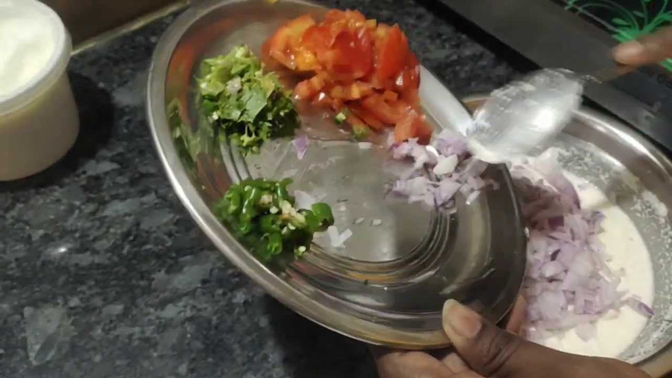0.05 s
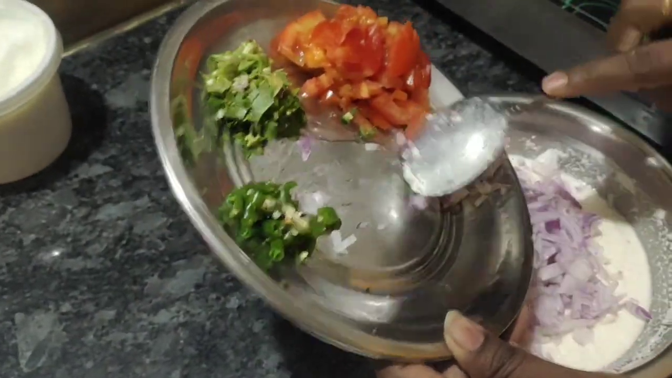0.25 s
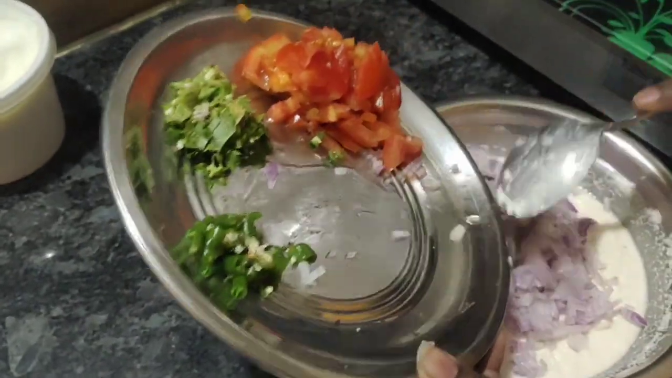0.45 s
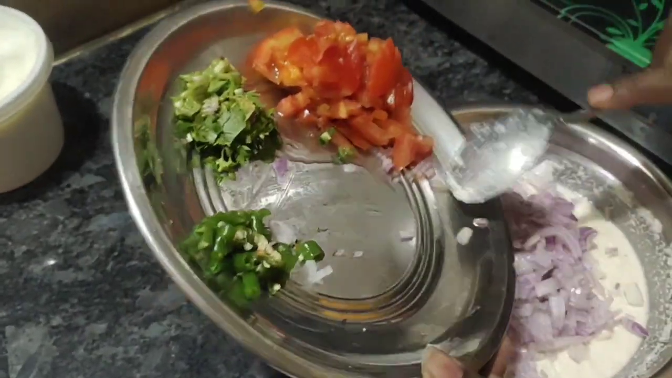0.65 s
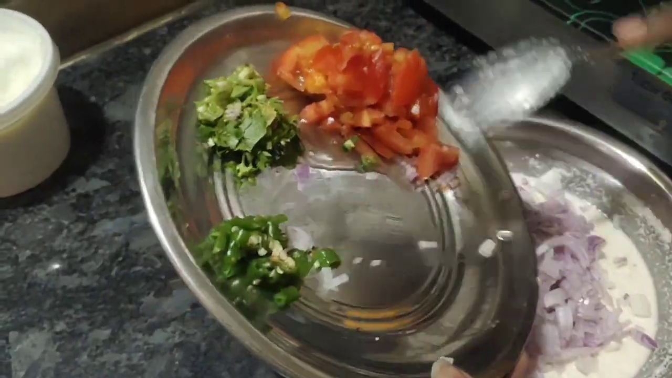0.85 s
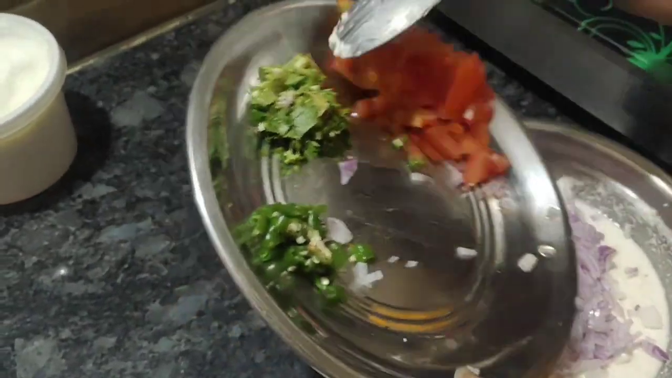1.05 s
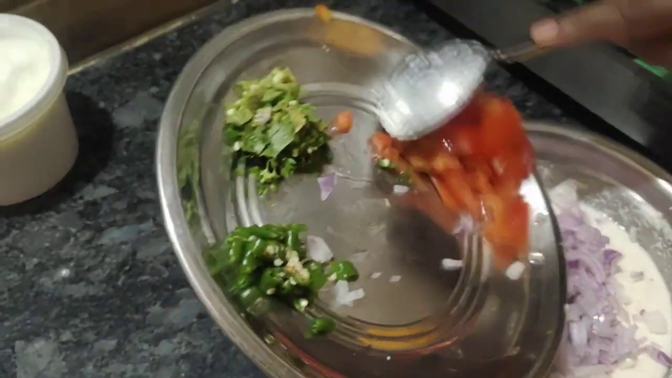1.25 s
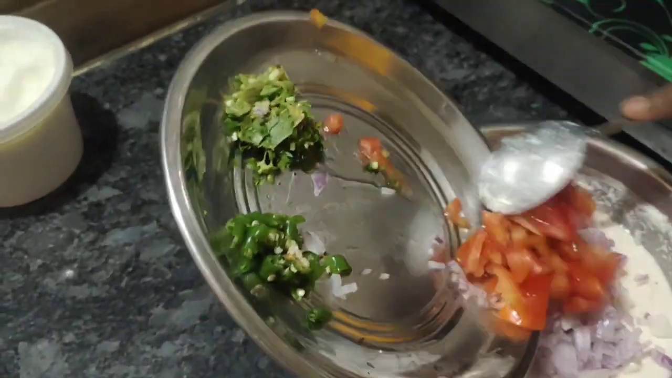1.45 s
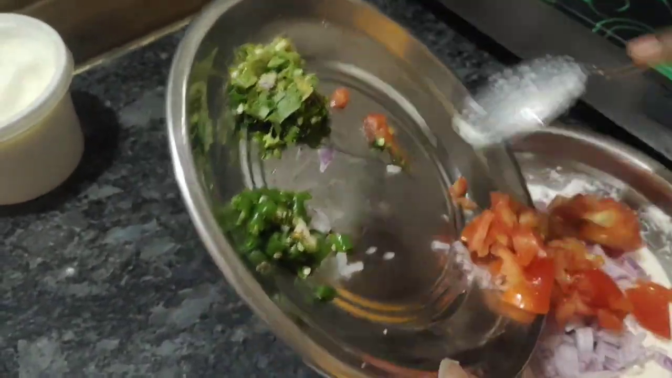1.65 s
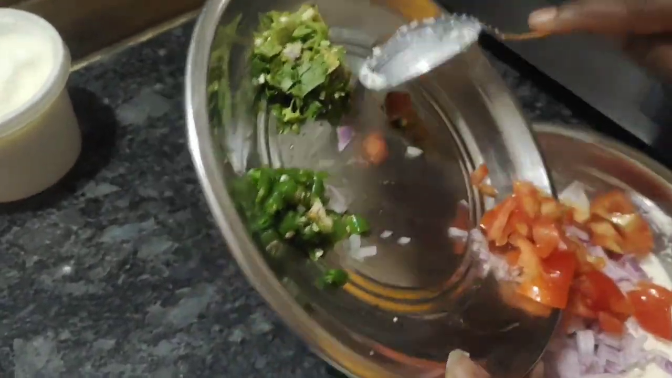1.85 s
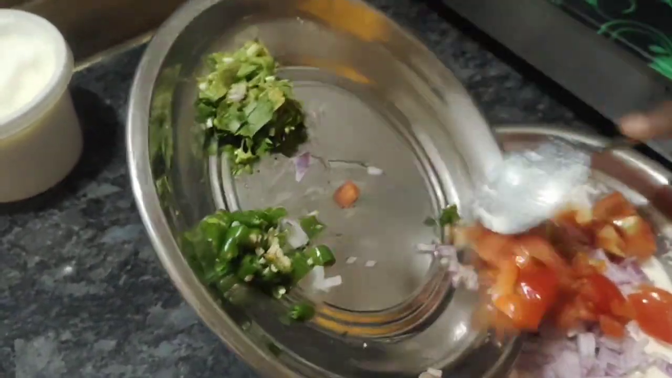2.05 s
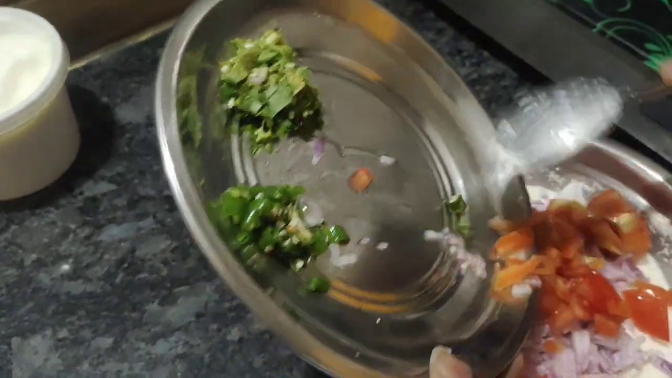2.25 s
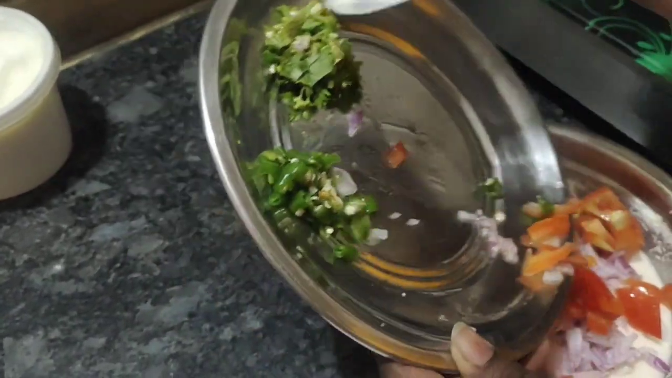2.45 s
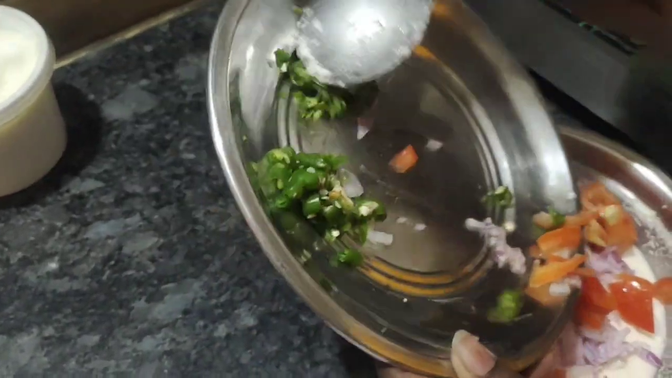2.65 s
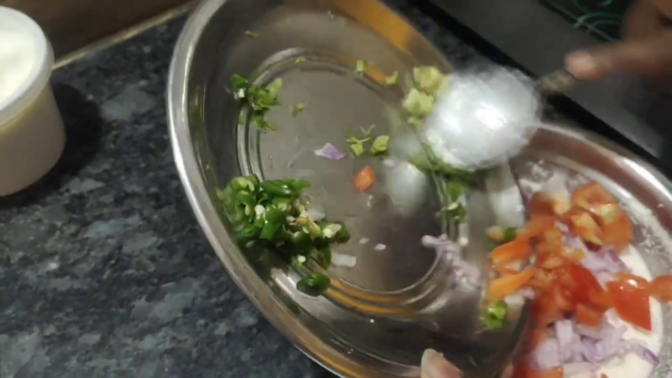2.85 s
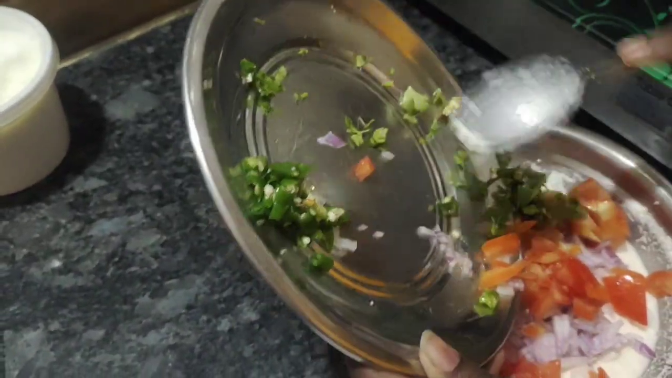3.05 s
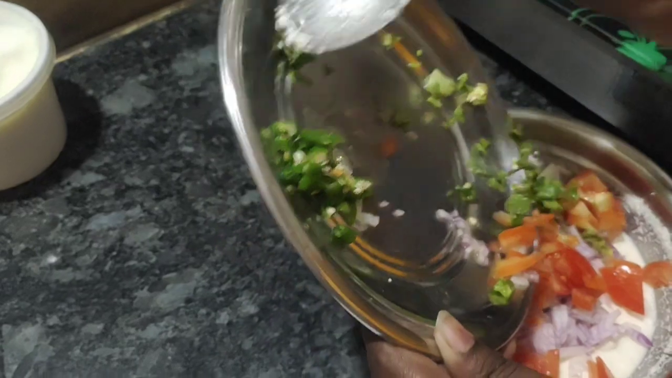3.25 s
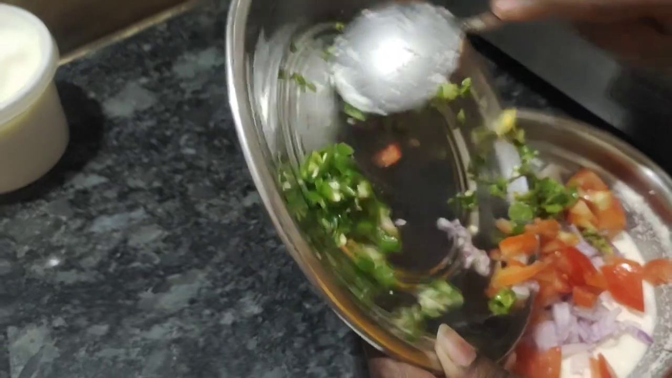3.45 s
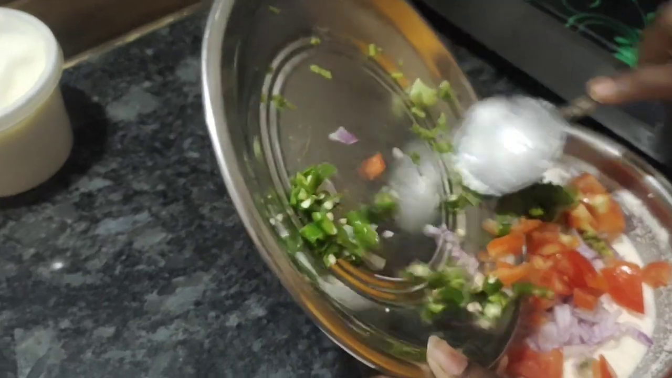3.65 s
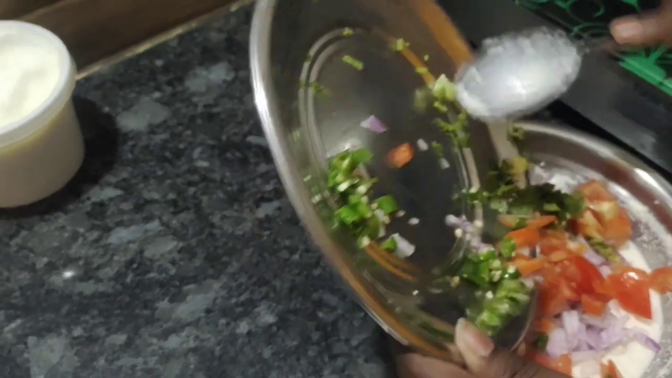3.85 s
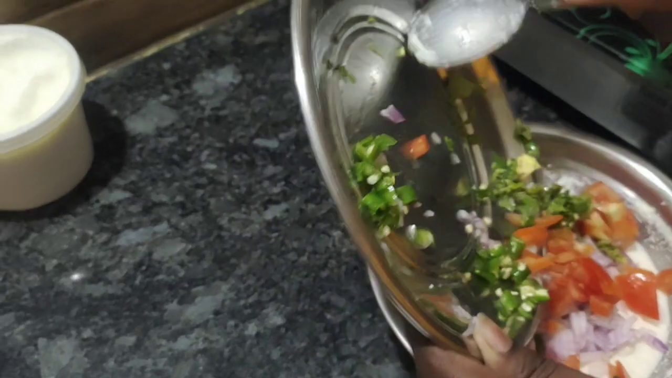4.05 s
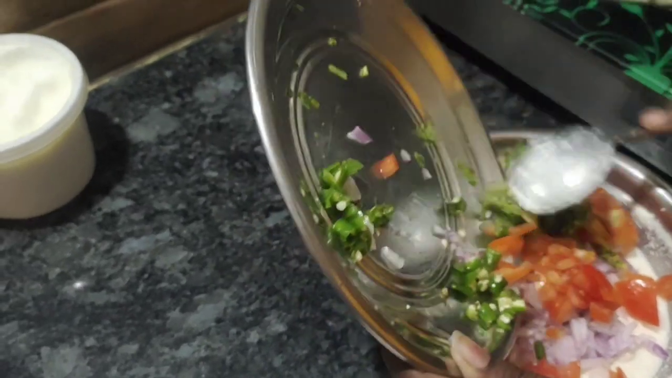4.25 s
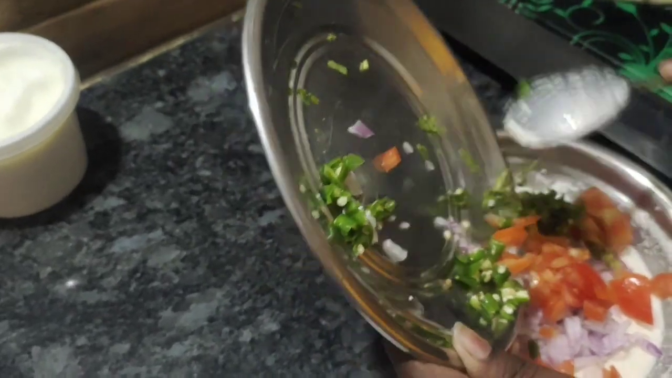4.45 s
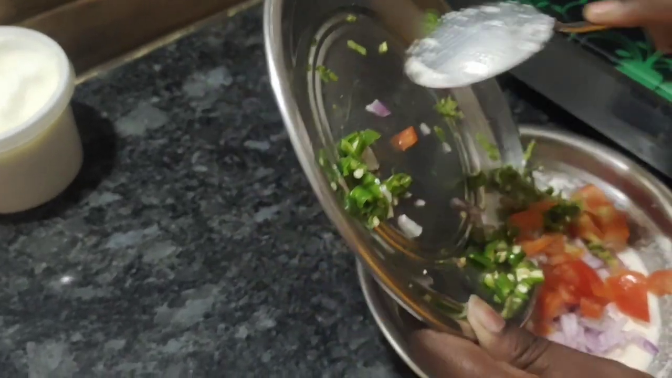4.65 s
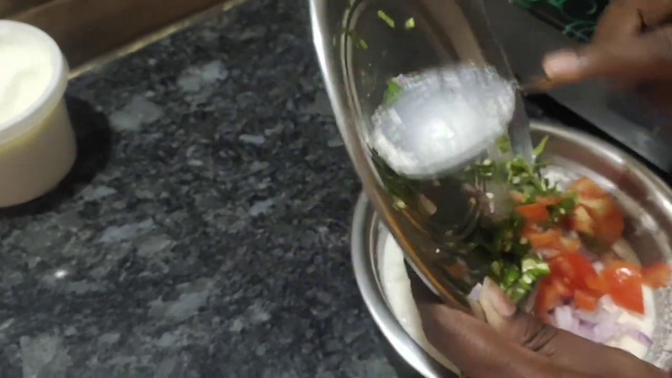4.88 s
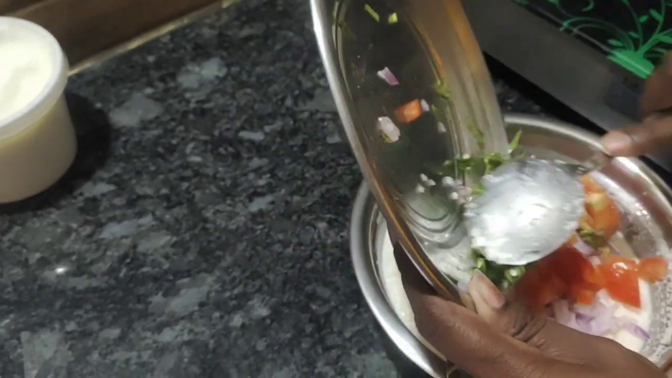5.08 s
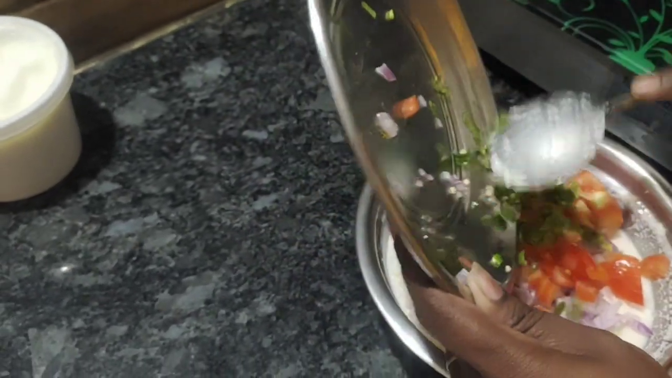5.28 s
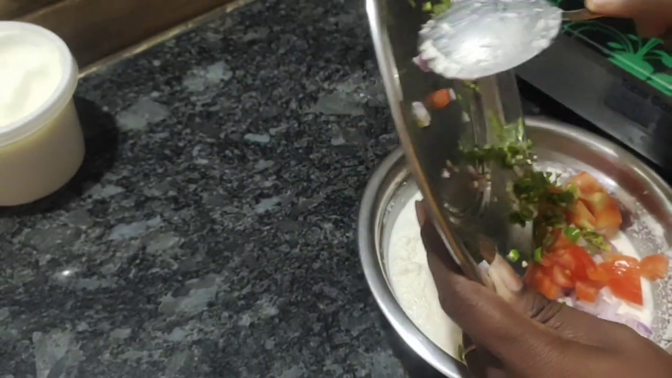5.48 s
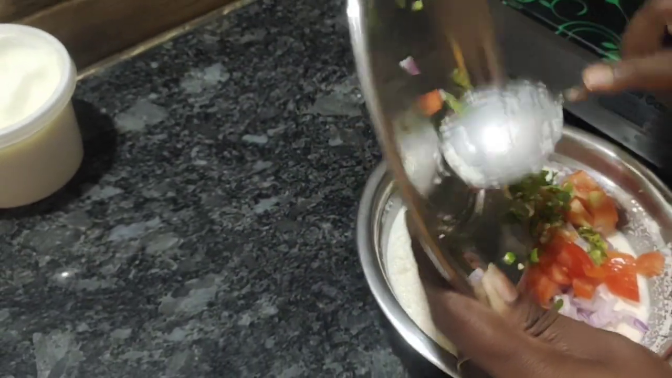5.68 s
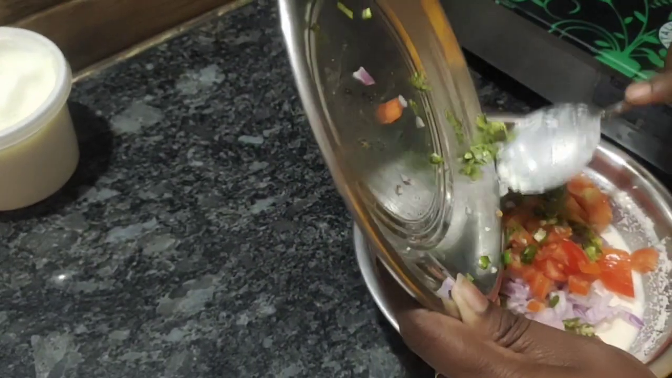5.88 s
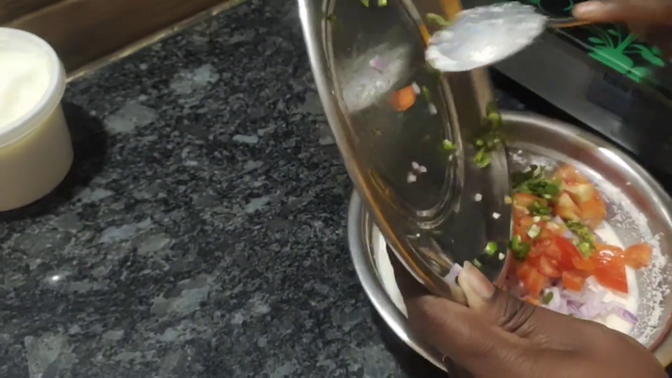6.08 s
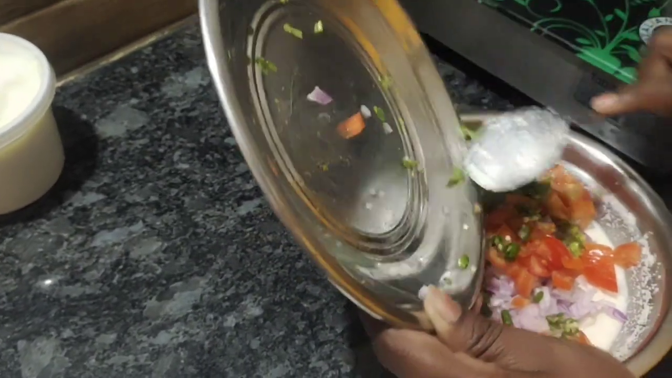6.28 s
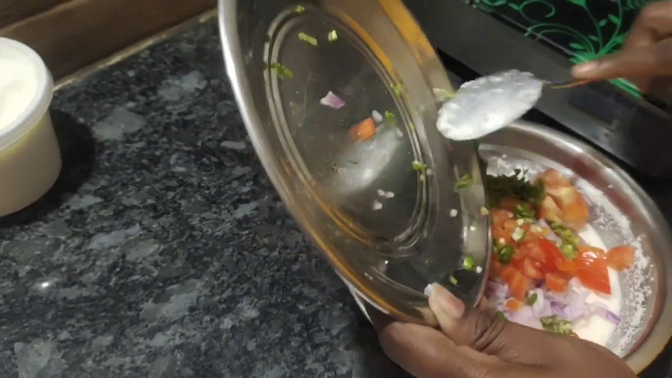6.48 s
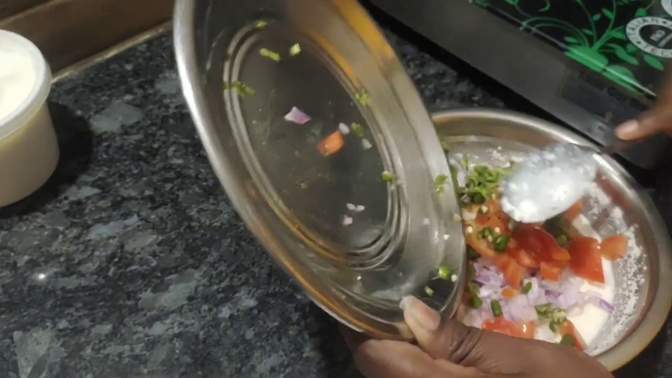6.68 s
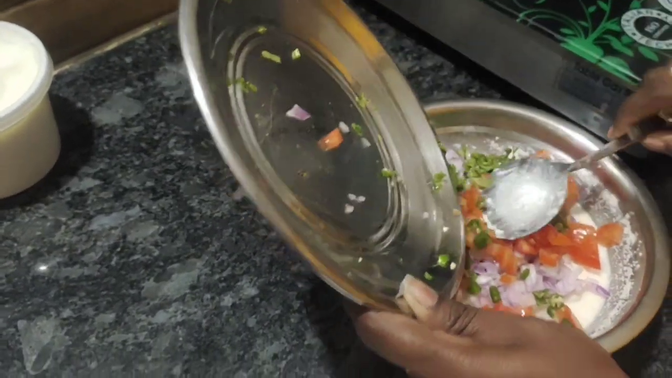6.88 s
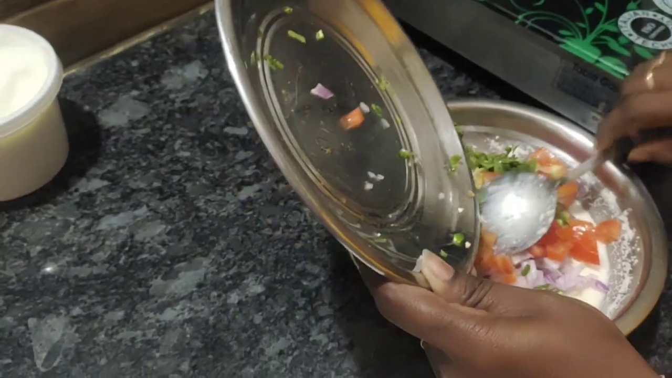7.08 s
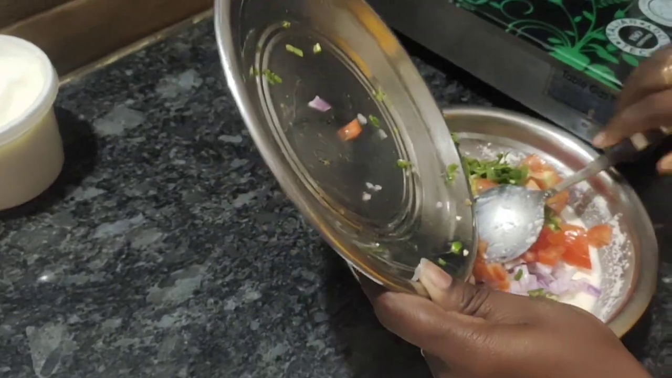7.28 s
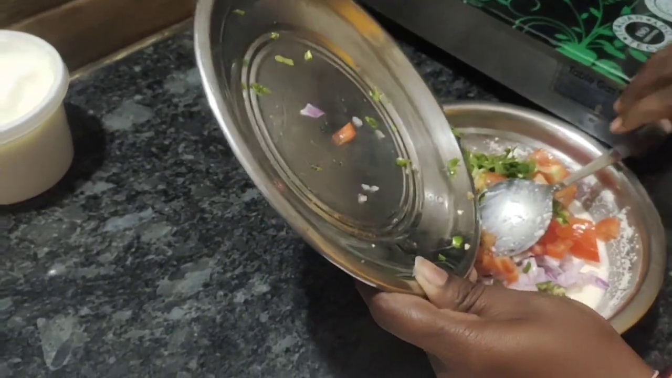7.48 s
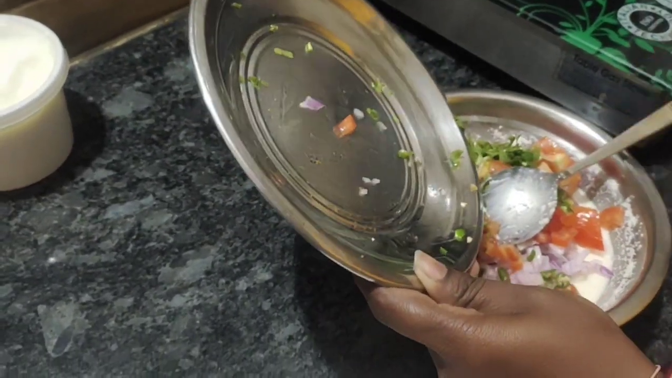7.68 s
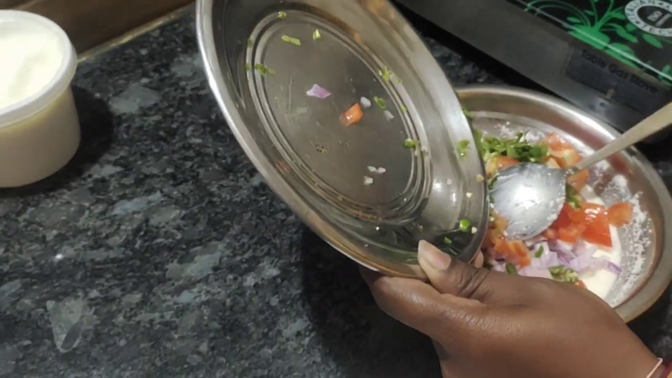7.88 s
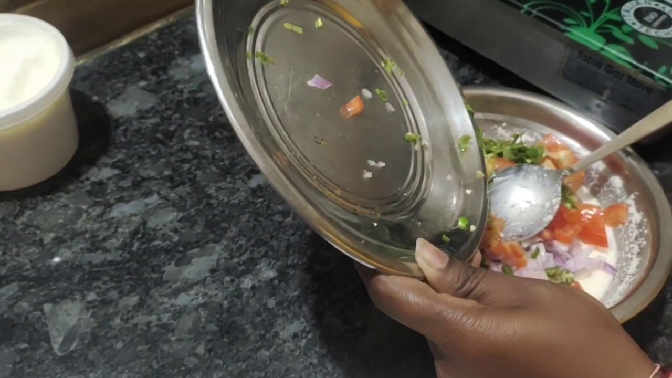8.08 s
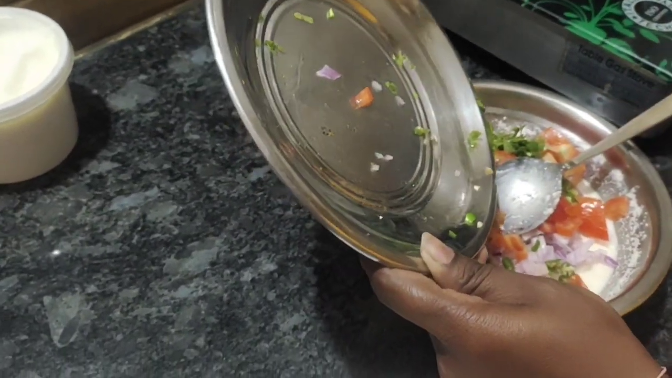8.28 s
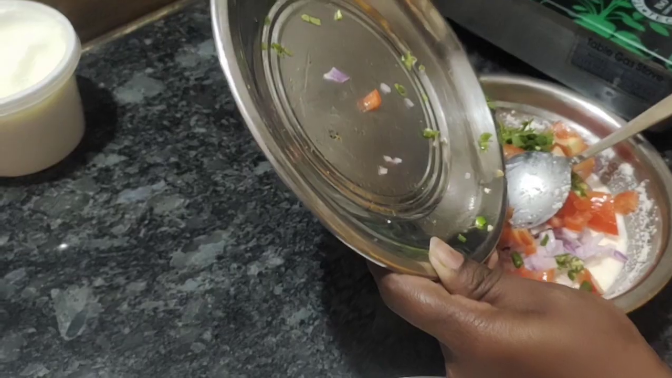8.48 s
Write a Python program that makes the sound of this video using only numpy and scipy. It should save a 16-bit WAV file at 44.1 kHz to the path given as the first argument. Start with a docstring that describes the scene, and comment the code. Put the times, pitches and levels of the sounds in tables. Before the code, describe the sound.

A quiet kitchen with hard walls, heard close through a noise-suppressed microphone, mainly on the left with faint hiss on the right. From 0.25 s a steel spoon makes light clinks on a thin hand-held steel plate, then a strong clank at 0.65 s with a short scrape. Raspy strokes follow at 1.1 to 1.5 s, then taps and scraping around 1.85 to 2.3 s. Another sharp clank comes at 2.6 s, a double hit at 3.3 to 3.4 s with longer scraping, and small ticks and a thud near 3.65 s. A bright scrape comes at 4.05 s, sparser strokes at 4.9 to 5.1 s, then firmer scrapes at 5.6, 5.8, 6.15 and 6.55 s. At 7.13 s the spoon drops into a steel bowl, clanking and ringing high for about half a second. Near silence follows, with a faint rustle around 8 s and tiny ticks at 8.2 to 8.3 s.

```python
"""Faint kitchen air, then a steel spoon tapping and scraping a hand-held steel plate; at 7.1 s it drops in a steel bowl.
Taps and drop: decaying modes plus noise bursts. Scrapes: random slips, partly through the plate's modes.
Small ticks, a faint rustle and soft tones fill the gaps; hard kitchen walls echo the spoon's sounds, ticks and tones.
Left: one microphone with noise suppression. Right: only a weak hiss that follows the left level."""
import sys
import numpy as np
from scipy import signal
from scipy.fft import rfft, irfft, next_fast_len
from scipy.io import wavfile
from scipy.ndimage import uniform_filter1d, map_coordinates

SR = 44100
rng = np.random.default_rng(int(sys.argv[2]) if len(sys.argv) > 2 else 0)


def unload_wav(signal):
    """Save mono or channel-first audio to the path in sys.argv[1] as 16-bit WAV at rate SR, clipped to [-1, 1]."""
    wavfile.write(
        sys.argv[1],
        SR,
        np.round(np.clip(np.atleast_2d(signal).T, -1, 1) * 32767).astype(np.int16),
    )


N = 376048

# kitchen air spectrum: (frequency [Hz], relative level [dB])
AIR_SPECTRUM = [(25, -39), (114, -2.5), (263, -7.5), (1260, -13.5), (2690, -18.5), (5880, -20), (6380, -6),
                (7510, -24), (16000, -31)]
# right-channel hiss spectrum: (frequency [Hz], relative level [dB])
HISS_SPECTRUM = [(30, -34.5), (120, 0.5), (350, 3), (600, -2.5), (3300, -8), (6500, -19), (15000, -26)]
# spoon blows on the plate:
# (time [s], relative level [dB], bass tilt [dB], middle tilt [dB], treble tilt [dB])
BLOWS = [(0.2427, -28.5, -10, 10.5, -6.5), (0.3401, -24, -0.5, 12.5, 3.5), (0.386, -33.5, 7.5, 21, -1.5),
         (0.407, -20.5, -11, -9, -12), (0.662, -12, -7.5, 8, -11.5), (1.1155, -19, -3, 9.5, -9),
         (1.8409, -32.5, 12.5, 7.5, -27), (2.0268, -27, 3, 4, -0.5), (2.043, -19.5, 2, 14, -2),
         (2.0553, -16.5, -9, -4.5, -5), (2.599, -12.5, -8, 5, -9.5), (2.6987, -26, 5.5, 12, -3),
         (2.7058, -17.5, 1.5, 13.5, -3.5), (3.292, -17.5, 5, 10, -4.5), (3.4033, -13, -0.5, 9.5, -10.5),
         (3.9935, -22, 4.5, 3.5, 5), (4.883, -27.5, 7.5, 1, -7), (5.586, -23.5, -1.5, -8, -6),
         (5.7706, -24, 9.5, 14, 4), (5.7924, -15, -6.5, 4.5, -3.5), (6.135, -19, 0.5, 9.5, -4.5),
         (6.212, -27, 1, 11, -7.5), (6.5636, -24, 9, -4.5, -6)]
# glancing taps, plate rings little:
# (time [s], relative level [dB], bass tilt [dB], middle tilt [dB], treble tilt [dB])
TAPS = [(2.9093, -26, 7, 1, -3), (4.2674, -27.5, -50, 8, -2), (6.227, -20, 3, -20, -10)]
# plate modes: (frequency [Hz], relative level [dB], t60 [s])
PLATE_MODES = [(312.3, 1.5, 0.43), (344, 0.5, 0.39), (393.4, 0.5, 0.4), (640, -13.5, 0.065),
               (760.4, -7.5, 0.23), (832, -8, 0.12), (931.3, -4, 0.18), (1238, -8, 0.078),
               (1589, -11, 0.082), (1968, -6, 0.059), (2112, -3, 0.2), (2215, -1, 0.55), (3140, -4, 0.42),
               (3580, -7.5, 0.71), (3641, 2, 0.092), (3940, 2.5, 0.2), (3850, -2, 0.26), (5130, -10, 0.15),
               (5950, -3.5, 0.17), (5940, -5, 0.64), (6290, -1, 0.25), (6300, -4, 0.15),
               (7080, -8.5, 0.012)]
# contact crack spectrum: (frequency [Hz], relative level [dB])
CRACK_SPECTRUM = [(80, -71.5), (338, -21), (575, -28), (2040, -21.5), (2720, -15), (3540, -7),
                  (4620, -13.5), (6740, -4.5), (9400, -31.5), (16000, -50)]
# plate's low hum: (time [s], level [dB])
HUM_COURSE = [(.25, -84), (.45, -57), (.62, -65), (1.05, -63.5), (1.55, -61.5), (2.4, -71), (3.2, -81),
              (3.9, -63), (4.3, -55), (4.7, -108), (6.9, -87)]
# spoon edge along the plate: (start [s], rise [s], hold [s], bright rasp level [dB], plate drone level [dB])
SCRAPES = [(0.259, 0.0028, 0.14, -50.5, -45.5), (0.369, 0.014, 0.085, -41.5, -47.5),
           (0.669, 0.021, 0.13, -49, -47), (1.118, .01, .08, -43, -39), (1.184, 0.086, 0.14, -35.5, -91),
           (1.463, 0.013, 0.04, -42, -50.5), (1.83, 0.014, 0.088, -61.5, -42.5),
           (1.881, 0.084, 0.026, -43, -57), (2.01, 0.015, 0.16, -38, -37),
           (2.299, 0.011, 0.017, -43, -56.5), (2.61, 0.0093, 0.077, -51, -40),
           (2.692, 0.0075, 0.04, -49.5, -60), (2.775, 0.015, 0.08, -40.5, -46),
           (3.299, 0.0032, 0.31, -48, -39.5), (3.597, 0.0062, 0.23, -55.5, -50.5),
           (3.859, 0.062, 0.13, -60, -57.5), (4.005, 0.017, 0.047, -75.5, -43.5),
           (4.062, 0.041, 0.1, -34, -51), (4.906, 0.011, 0.12, -40, -43.5), (5.04, 0.011, 0.0074, -31, -39),
           (5.117, 0.0082, 0.021, -44, -51), (5.581, 0.0093, 0.21, -43.5, -36),
           (5.807, 0.025, 0.11, -45, -37), (6.128, 0.035, 0.067, -33, -30),
           (6.248, 0.032, 0.035, -43.5, -41.5), (6.559, 0.04, 0.045, -39, -41.5)]
# rasp spectrum, also the rustle's: (frequency [Hz], relative level [dB])
RASP_SPECTRUM = [(2000, -34), (2750, -26), (3300, -8), (4200, -10), (4900, -7), (5600, -9), (6700, -2),
                 (8800, -24), (10500, -36.5), (15500, -36.5)]
# kitchen reverberation: (frequency [Hz], t60 [s])
KITCHEN_T60 = [(200, 0.35), (1000, 0.37), (4000, 0.39), (10000, 0.18), (16000, 0.21)]
# soft tones: (start [s], length [s], first frequency [Hz], last frequency [Hz], level [dB])
FAINT_TONES = [(1.033, 0.11, 334, 332, -57), (1.502, 0.12, 469, 468, -58), (4.767, 0.25, 1067, 1233, -61.5),
               (7.427, 0.13, 980, 973, -65.5), (7.787, 0.22, 655.5, 649, -68)]
# small ticks and thuds: (time [s], level [dB], pitch [Hz], t60 [s])
TICKS = [(3.6, -34, 3460, 0.033), (3.601, -43, 6850, 0.047), (3.642, -27, 352, 0.15),
         (3.663, -38, 3740, .04), (3.7, -30, 3700, 0.021), (3.738, -42.5, 6630, .04),
         (4.503, -55.5, 3680, 0.071), (6.288, -25.5, 3820, 0.023), (4.502, -38.5, 590, 0.035),
         (5.31, -51.5, 6420, 0.05), (6.864, -56, 2840, 0.14), (6.907, -47.5, 6660, 0.03),
         (7.301, -59.5, 125, 1.2), (7.9, -64, 89.4, 0.56), (8.215, -43, 2230, 0.032),
         (8.284, -50.5, 3190, 0.087), (8.293, -34.5, 6920, 0.028)]
# rustle: (time [s], level [dB])
RUSTLE_COURSE = [(7.8, -86.5), (7.95, -62.5), (8.1, -58), (8.2, -72), (8.27, -84)]
# spoon lands in the bowl: (time [s], relative level [dB])
DROP = [(7.1325, -9.5)]
# bowl modes: (frequency [Hz], relative level [dB], t60 [s])
BOWL_MODES = [(501, -26, .35), (926, -31, .5), (1690, -26, .45), (2320, -22, .45), (3225, -14, .55),
              (3860, -12, .4), (3736, -11, .42), (5270, -10, .26), (5669, -7, .75), (5959, -8, .34),
              (6212, -12, .37), (6756, -15, .4), (14930, -20, .04)]

AIR_DB = -66
GRAZE_S = 0.005  # light touch before a blow
TAP_RING_DB = -12
START_DB, SAG_DB_PER_S, LIFT_DB_PER_S = -23.5, 50, 477.5  # scrape: first touch, sliding loss, fall on lifting
TOP_HZ = 16100


def amp(db):
    """Gain of a level in dB."""
    return 10 ** (np.asarray(db) / 20)


def unit(x):
    """x at rms 1."""
    return x / np.sqrt(np.mean(x ** 2) + 1e-20)


def along(points, hz):
    """(frequency [Hz], value) points read on a log-frequency axis."""
    f, v = np.transpose(points)
    return np.interp(np.log(hz + 1), np.log(f + 1), v)


def filtered(x, response):
    """x times a response of frequency."""
    m = next_fast_len(len(x) + SR // 2)
    return irfft(rfft(x, m) * response(np.fft.rfftfreq(m, 1 / SR)), m)[:len(x)]


def coloured(x, spectrum):
    """x shaped by a spectrum, at rms 1."""
    return unit(filtered(x, lambda hz: amp(along(spectrum, hz))))


def patchy(x, depth_db, size=256):
    """x with patches of random gain; a larger size makes them narrower and longer."""
    z = signal.stft(x, nperseg=size)[2]
    field = uniform_filter1d(rng.standard_normal(z.shape), size=3, axis=0)
    field = uniform_filter1d(field, size=14, axis=1)
    return signal.istft(z * amp(depth_db * unit(field)), nperseg=size)[1][:N]


def grit(rate_hz, spread_db):
    """Dense tiny slips at random moments; the pressure behind them flutters."""
    flutter_hz = 150
    knots = rng.standard_normal(int(N * flutter_hz / SR) + 4)
    flutter = map_coordinates(knots, [np.arange(N) * flutter_hz / SR])
    slips = (rng.random(N) < rate_hz / SR) * rng.standard_normal(N)
    return slips * amp(spread_db * flutter)


def course(rows):
    """Gain per sample from (time [s], level [dB]) rows; silent outside them."""
    s, db = np.transpose(rows)
    t = np.arange(N) / SR
    edge = np.clip(np.minimum(t - s[0], s[-1] - t) / 0.005, 0, 1)
    return edge * amp(np.interp(t, s, db))


def place(out, at_s, sound):
    """Add a sound into out at a time."""
    out[round(at_s * SR):][:len(sound)] += sound


def air():
    """Kitchen air: coloured noise with slow random gain patches."""
    noise = patchy(rng.standard_normal(N), depth_db=3.2, size=1024)
    return amp(AIR_DB) * coloured(noise, AIR_SPECTRUM)


def weak_hiss(left):
    """Coloured noise whose level swells a little after the left channel's sound."""
    power = np.abs(uniform_filter1d(left ** 2, size=2600, origin=1000))  # window mostly in the past
    loud_db = 10 * np.log10(power + 1e-9)
    hiss = coloured(patchy(rng.standard_normal(N), depth_db=7.0), HISS_SPECTRUM)
    return amp(-66.0 + 6.1 * np.tanh((loud_db + 52.5) / 9)) * hiss


def strike(modes, tilt, knock_db, crack_db, shimmer_db, shimmer_t60_s, waver, scatter_db, detune, ring_db=0):
    """Light graze, then modes with a fast knock and a slow ring, plus a noise crack and dense shimmer."""
    t = np.arange(SR * 2 // 3) / SR - GRAZE_S
    hz, db, t60 = np.transpose(modes)[:, :, None]
    level = amp(db + along(tilt, hz) + scatter_db * rng.standard_normal(hz.shape))
    hz = hz * (1 + detune * rng.standard_normal(hz.shape))
    decay = amp(ring_db - 60 * t / t60) + amp(knock_db - 60 * t / 0.018)
    steps = rng.standard_normal((len(hz), len(t) // 32 + 1))
    drift = waver * np.cumsum(steps, axis=1).repeat(32, axis=1)[:, :len(t)]  # phase random walk [rad]
    phase = 2 * np.pi * (hz * t + rng.random(hz.shape)) + drift
    ring = (level * decay * np.sin(phase)).sum(axis=0)
    burst = filtered(rng.standard_normal(len(t)), lambda f: amp(along(CRACK_SPECTRUM, f) + along(tilt, f)))
    fall = amp(crack_db - 60 * t / 0.03) + amp(shimmer_db - 60 * t / shimmer_t60_s)
    rise = np.where(t > 0, 1 - np.exp(-np.abs(t) / 0.00022), amp(-21.0 + 4500 * t))
    return (ring + fall * burst) * rise


def blows():
    """Plate taps: each lands on another spot, so tilt differs and mode levels scatter; the grip bends pitches."""
    out = np.zeros(N + SR)
    rows = [(0, row) for row in BLOWS] + [(TAP_RING_DB, row) for row in TAPS]
    for ring_db, (s, db, bass_db, middle_db, treble_db) in rows:
        tilt = [(450, bass_db), (1000, middle_db), (2500, 0.0056), (6500, treble_db)]
        hit = strike(PLATE_MODES, tilt, knock_db=12.5, crack_db=42.0, shimmer_db=12.0, shimmer_t60_s=0.91,
                     waver=0.11, scatter_db=5.0, detune=0.009, ring_db=ring_db)
        place(out, s - GRAZE_S, amp(db - 25.5) * hit)
    return out[:N]


def plate(x, damping):
    """Plate modes as resonators, widened by the pressing spoon."""
    def response(f):
        total = 0
        for k, (centre_hz, db, t60) in enumerate(PLATE_MODES):
            width_hz = damping * np.log(1000) / (np.pi * t60)
            loss = 1j * f * width_hz
            total = total + (-1) ** k * amp(db) * loss / (centre_hz ** 2 - f * f + loss)
        return total
    return filtered(x, response)


def pressure():
    """Rasp and drone gains: each scrape swells in, sags as it slides, dies when the spoon lifts."""
    rasp, drone = np.zeros((2, N + SR))
    t = np.arange(SR // 2) / SR
    for s, rise, hold, rasp_db, drone_db in SCRAPES:
        swell_db = START_DB * np.clip(1 - t / max(rise, 0.001), 0, 1)
        sag_db = SAG_DB_PER_S * np.clip(t - rise, 0, hold)
        lift_db = LIFT_DB_PER_S * np.maximum(t - rise - hold, 0)
        shape = amp(swell_db - sag_db - lift_db)
        place(rasp, s, amp(rasp_db) * shape)
        place(drone, s, amp(drone_db) * shape)
    return rasp[:N], drone[:N]


def scraping():
    """Spoon-edge slips: a bright rasp, the plate droning under the push, and its low hum."""
    rasp_gain, drone_gain = pressure()
    slips = coloured(patchy(grit(12000, spread_db=1.8), depth_db=2), RASP_SPECTRUM)
    slips = patchy(slips, depth_db=4, size=1024)
    rasp = slips + amp(-8) * unit(plate(slips, damping=3))
    pushed = plate(patchy(grit(2500, spread_db=3.5), depth_db=5, size=2048), damping=1.7)
    drone = filtered(pushed, lambda hz: 1 / (1 + (hz / 3000) ** 4) / (1 + (300 / (hz + 1)) ** 6))
    hum = filtered(plate(grit(4700, spread_db=-4.5), damping=2.2), lambda hz: 1 / (1 + (hz / 450) ** 8))
    return rasp_gain * rasp + drone_gain * unit(drone) + course(HUM_COURSE) * unit(hum)


def kitchen(x, step):
    """Wall echoes: decaying noise tails, 11 ms late; a moving source gets a new tail every step samples."""
    out = np.zeros(2 * N + SR)
    for at in range(0, N, step):
        hz, t, z = signal.stft(rng.standard_normal(SR * 2 // 3), SR, nperseg=256)
        decay = amp(-60 * t / along(KITCHEN_T60, hz)[:, None])
        tail = signal.istft(z * decay, SR, nperseg=256)[1]
        wet = signal.fftconvolve(x[at:at + step], tail / np.linalg.norm(tail))
        out[at + round(0.011 * SR):][:len(wet)] += wet
    return out[:N]


def faint():
    """Soft gliding sines, phase slightly unsteady, fading in and out."""
    out = np.zeros(N + SR)
    for s, length, first_hz, last_hz, db in FAINT_TONES:
        u = np.linspace(0, 1, round(length * SR))
        glide_hz = first_hz + (last_hz - first_hz) * u
        drift = 0.038 * np.cumsum(rng.standard_normal(len(u)))
        tone = np.sin(2 * np.pi * np.cumsum(glide_hz) / SR + drift)
        place(out, s, amp(db) * np.sqrt(np.abs(np.sin(np.pi * u))) * tone)
    return out[:N]


def ticks():
    """Damped clicks and thuds, each a narrow-band noise puff, plus a faint rustle of dense slips."""
    out, t = np.zeros(N + SR), np.arange(SR // 3) / SR
    for s, db, hz, t60 in TICKS:
        band = lambda f: np.exp(-(np.log(f / hz + 1e-9) / 0.19) ** 2)
        puff = unit(filtered(rng.standard_normal(len(t)), band))
        place(out, s, amp(db - 60 * t / t60) * (1 - np.exp(-t * hz / 3)) * puff)
    rustle = coloured(grit(8000, spread_db=2.5), RASP_SPECTRUM)
    return out[:N] + course(RUSTLE_COURSE) * rustle


def drop():
    """The spoon falls into the bowl, which rings freely at its own modes."""
    out = np.zeros(N + SR)
    tilt = [(300, 10), (1500, 12), (3500, 2), (6000, 2.5)]  # (frequency [Hz], level [dB])
    for s, db in DROP:
        hit = strike(BOWL_MODES, tilt, knock_db=0, crack_db=14, shimmer_db=10.5, shimmer_t60_s=0.56,
                     waver=0.035, scatter_db=1.5, detune=0)
        place(out, s - GRAZE_S, amp(db - 15.0) * hit)
    return out[:N]


def suppressed(x, gate_db, share_db, memory_s, least_db):
    """Noise suppression: the noise estimate lags behind loud sound, so tails and the hush after are turned down."""
    z = signal.stft(x, nperseg=512)[2]
    power = uniform_filter1d(np.abs(z) ** 2, size=5, axis=0)
    power = np.abs(uniform_filter1d(power, size=3, axis=1))
    keep = np.exp(-256 / SR / memory_s)  # per 256-sample hop
    lagging = signal.lfilter([1 - keep], [1, -keep], power, axis=1)
    noise = amp(2 * share_db) * lagging + amp(2 * gate_db)  # doubled dB: power
    gain = np.maximum(power / (power + noise), amp(least_db))
    return signal.istft(z * gain, nperseg=512)[1][:N]


def scene():
    """All sounds at the one microphone; thin steel sends out little deep bass."""
    thin = lambda hz: (1j * hz / (1j * hz + 115)) ** 3
    moving = filtered(blows() + scraping(), thin) + faint() + ticks()
    bowl = filtered(drop(), thin)
    walls = kitchen(moving, step=SR // 8) + kitchen(bowl, step=N)
    return np.array([moving + bowl + amp(-6.5) * walls + air(), np.zeros(N)])


def record(dry):
    """Left: amplified, noise-suppressed microphone. Right: weak hiss. Both cut off above TOP_HZ."""
    left = suppressed(amp(4.0) * dry[0], gate_db=-93.5, share_db=-20.5, memory_s=0.066, least_db=-10.5)
    right = weak_hiss(left)
    return np.array([filtered(ch, lambda hz: hz < TOP_HZ) for ch in (left, right)])


dry = scene()
out = record(dry)
unload_wav(out)
```